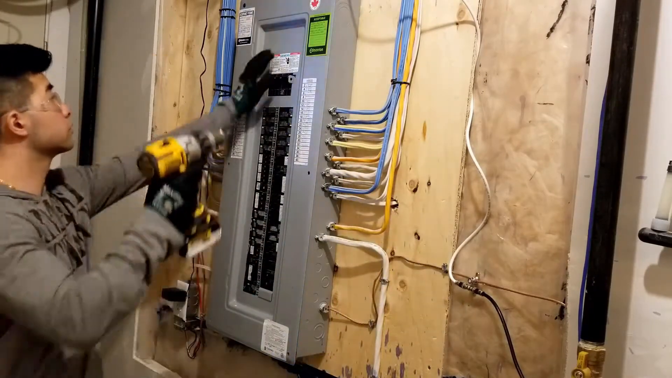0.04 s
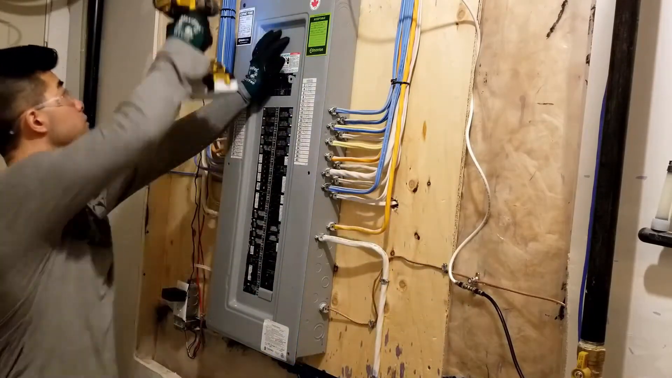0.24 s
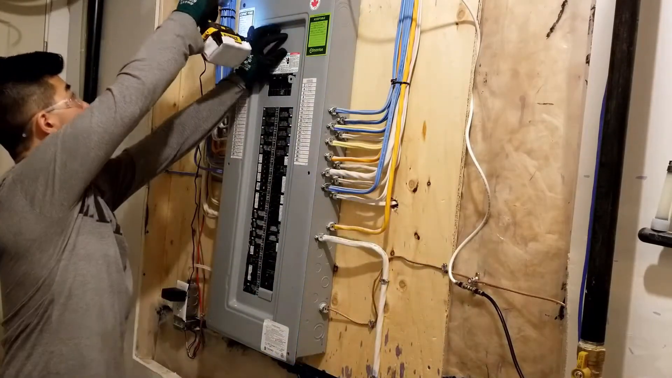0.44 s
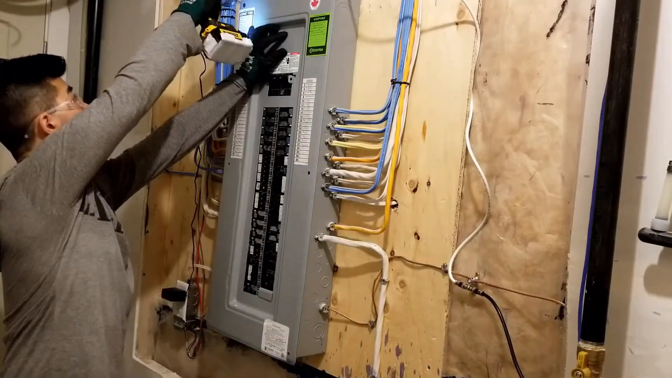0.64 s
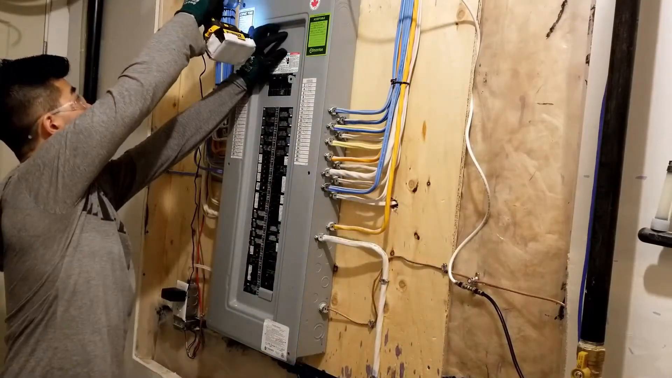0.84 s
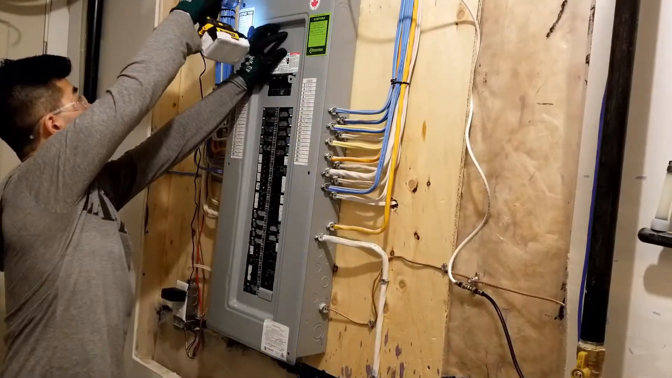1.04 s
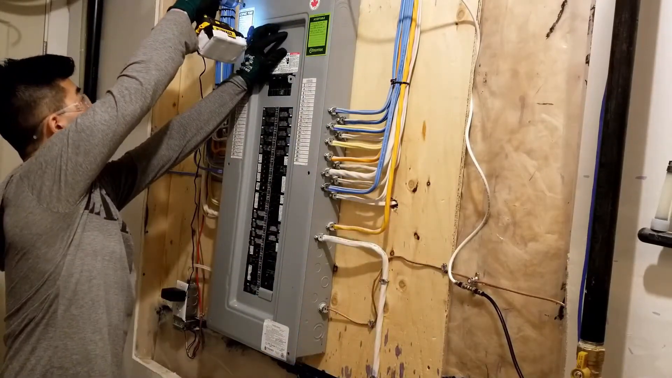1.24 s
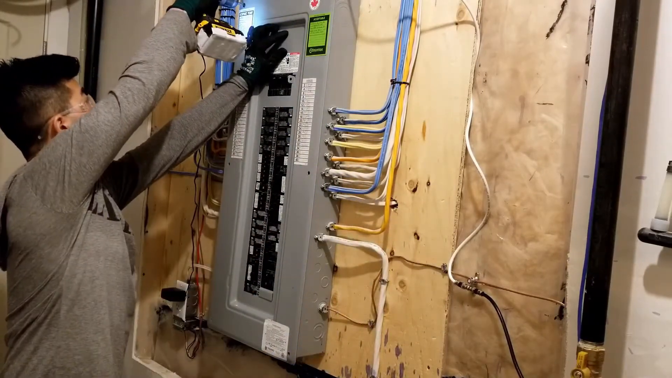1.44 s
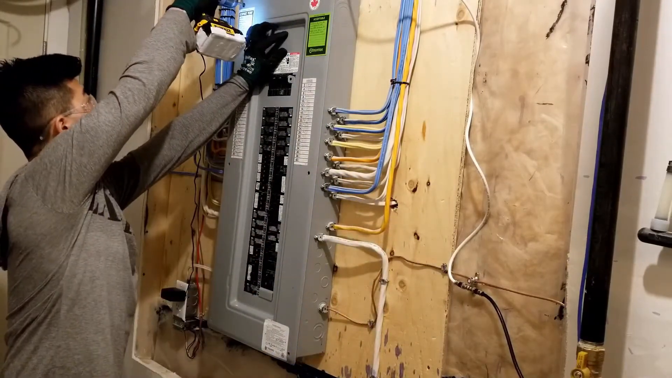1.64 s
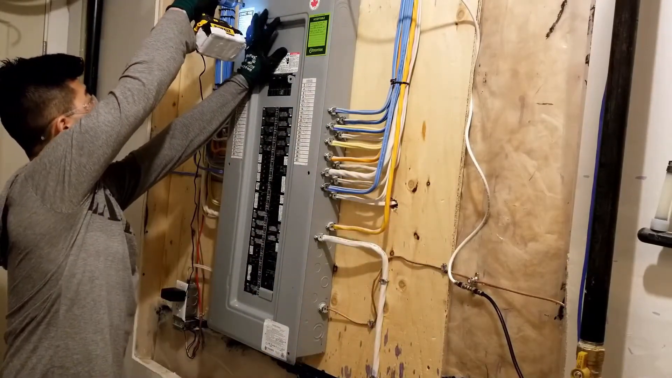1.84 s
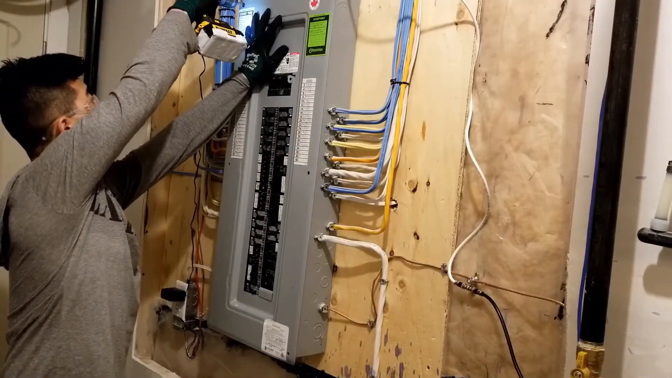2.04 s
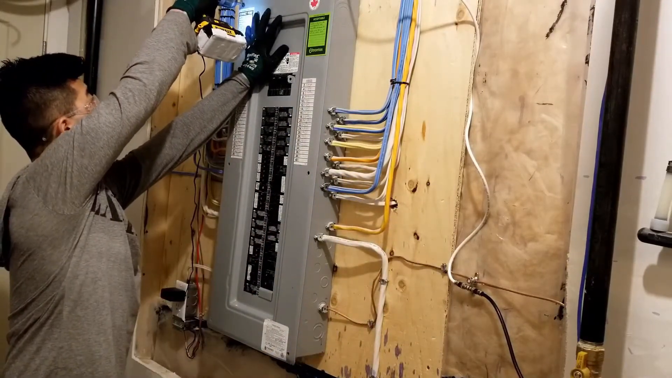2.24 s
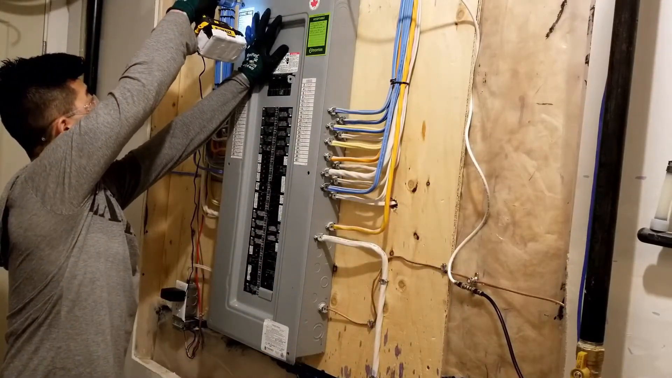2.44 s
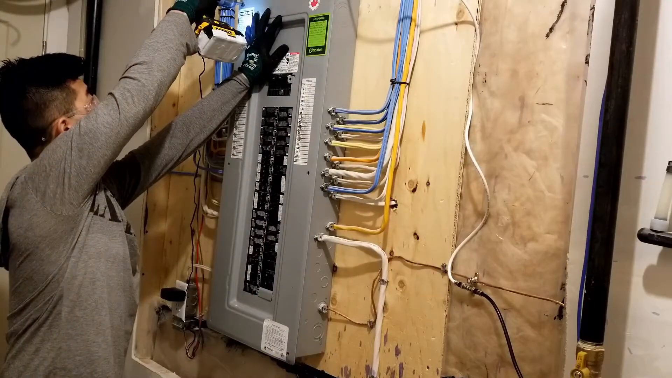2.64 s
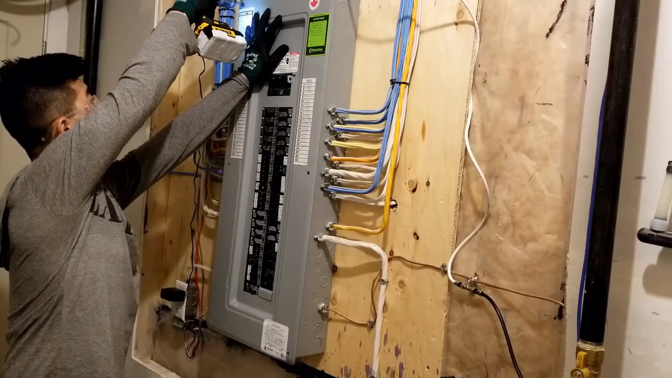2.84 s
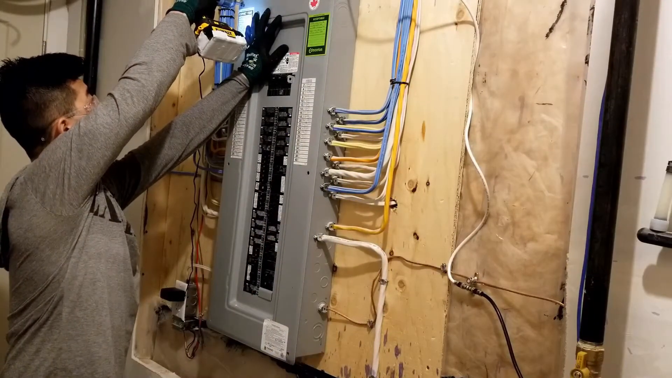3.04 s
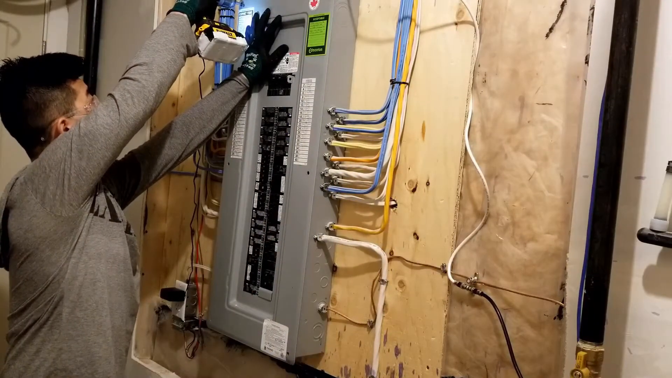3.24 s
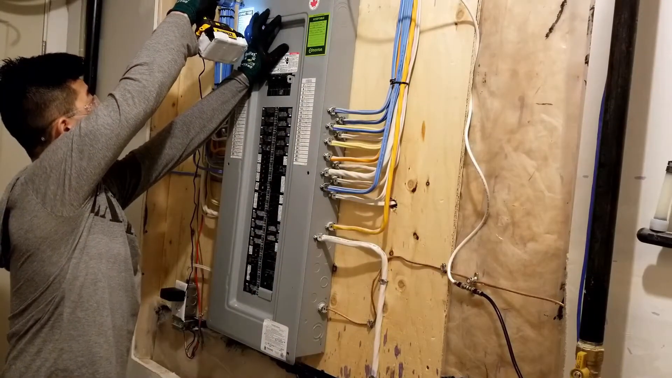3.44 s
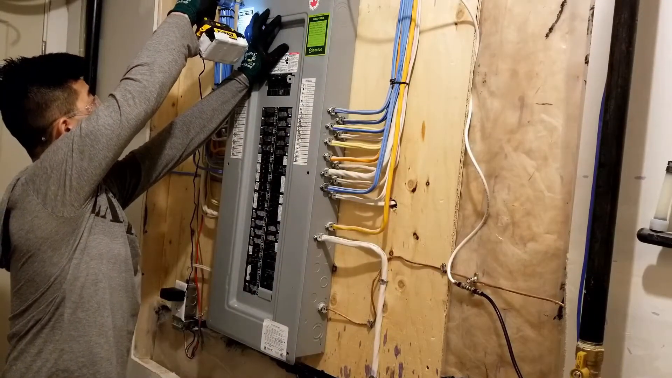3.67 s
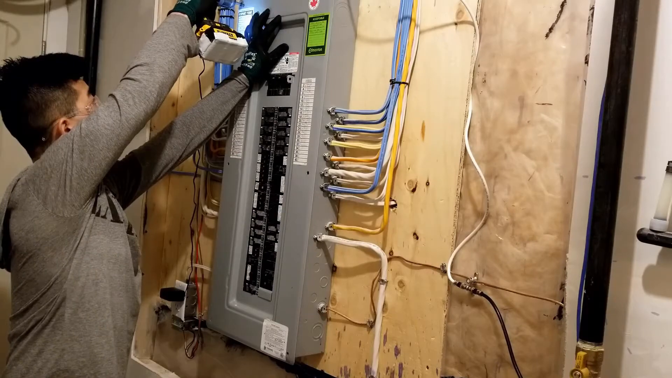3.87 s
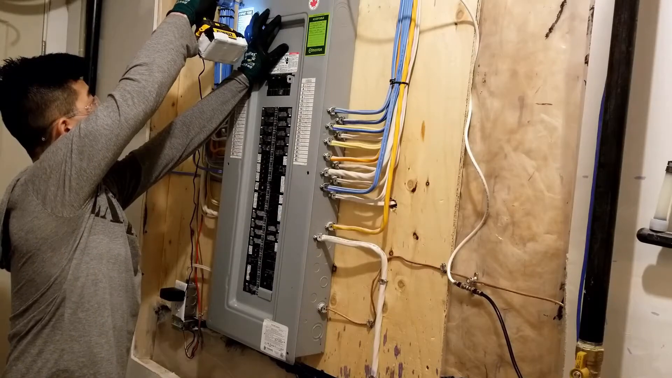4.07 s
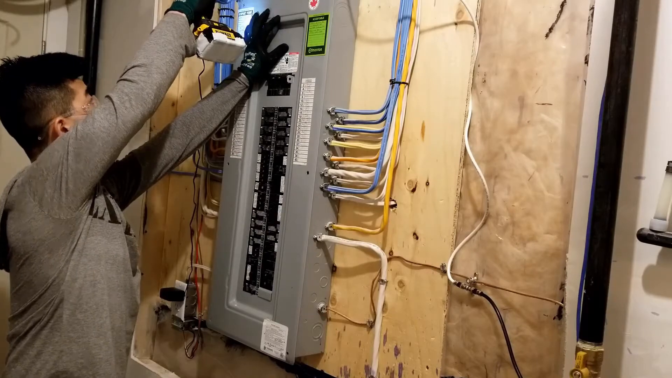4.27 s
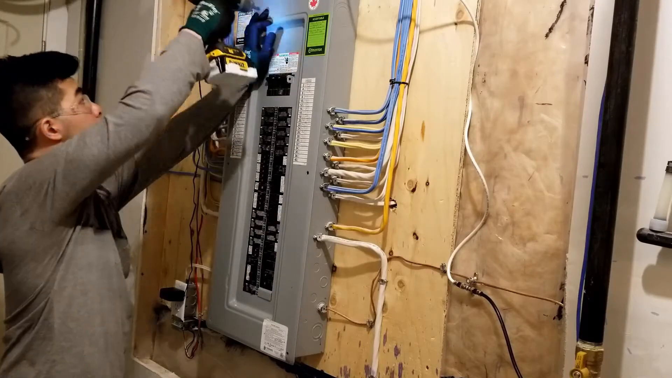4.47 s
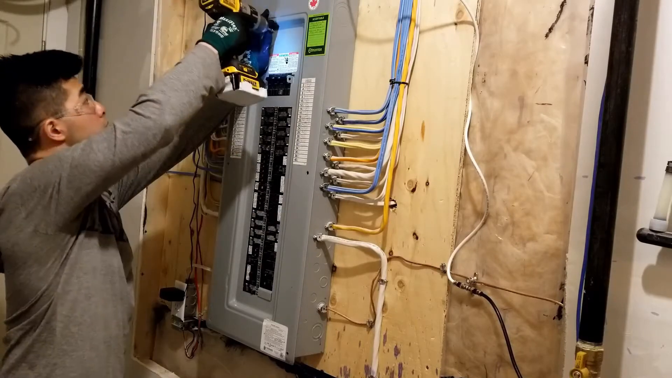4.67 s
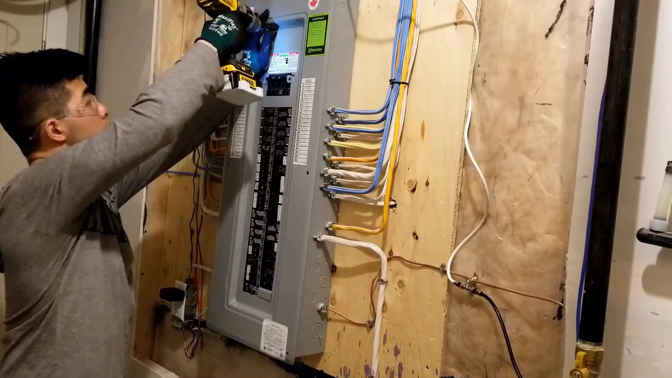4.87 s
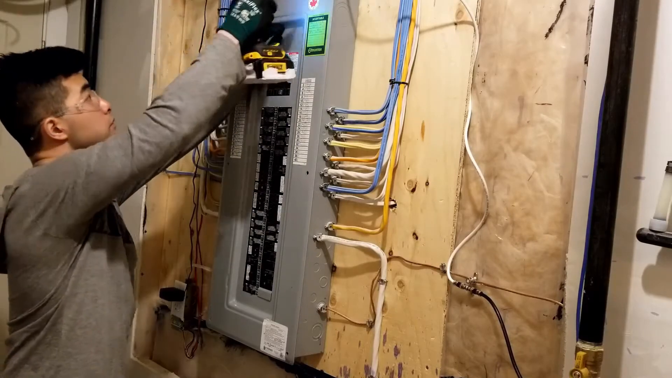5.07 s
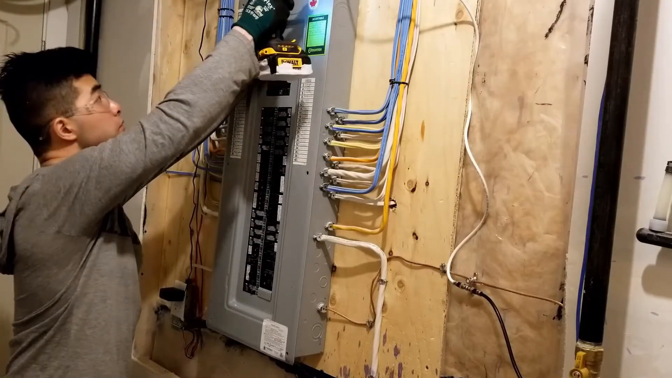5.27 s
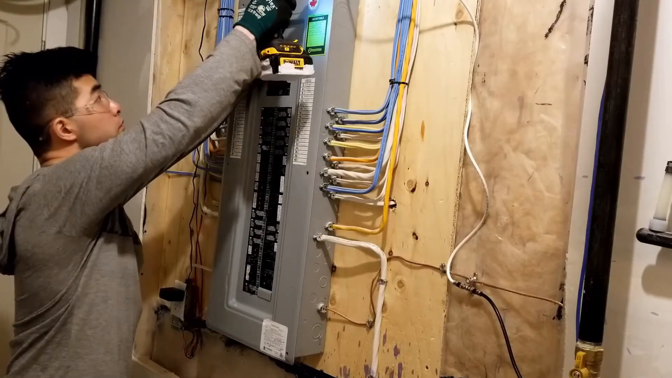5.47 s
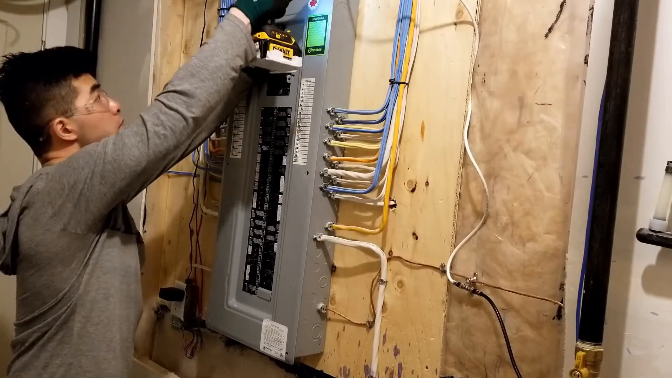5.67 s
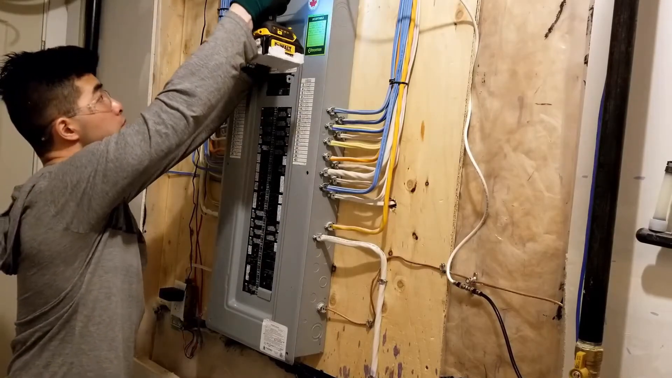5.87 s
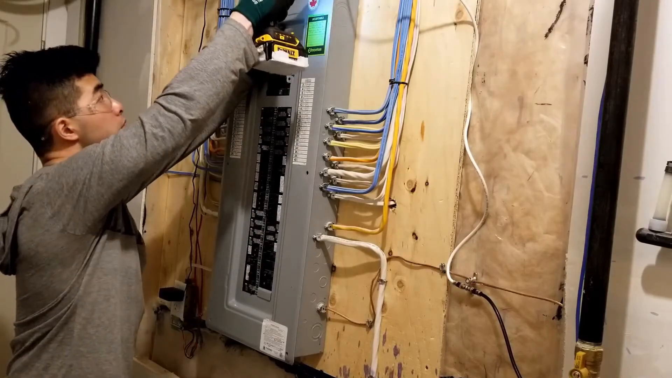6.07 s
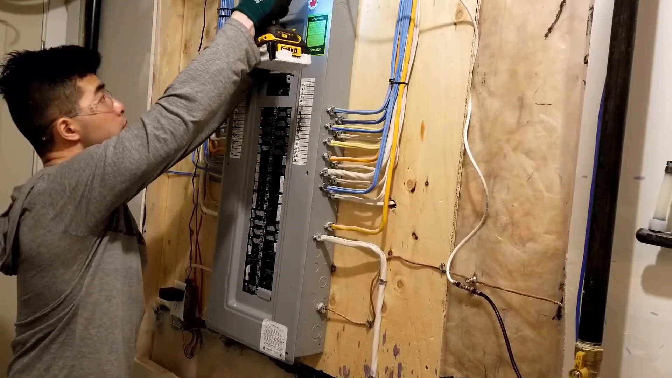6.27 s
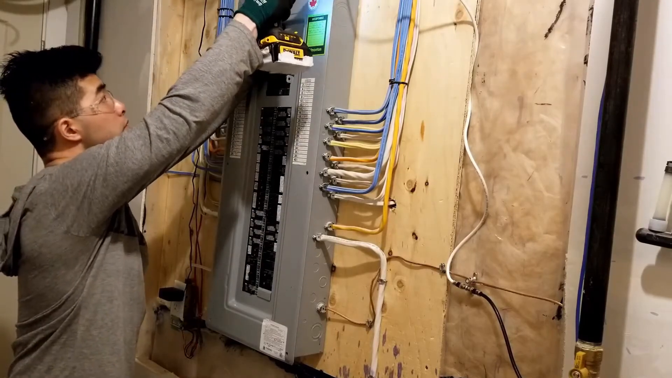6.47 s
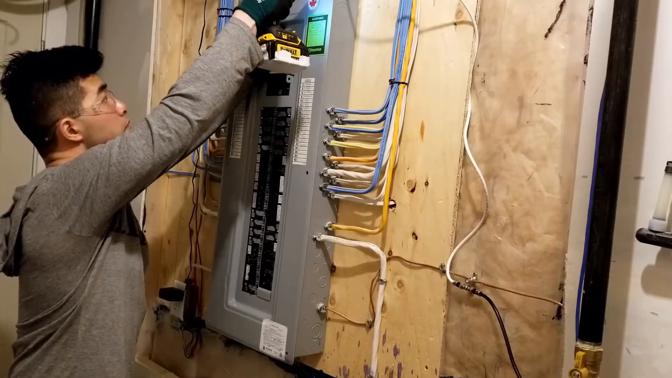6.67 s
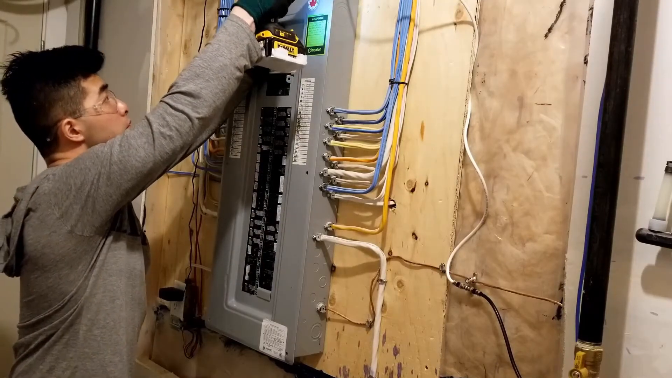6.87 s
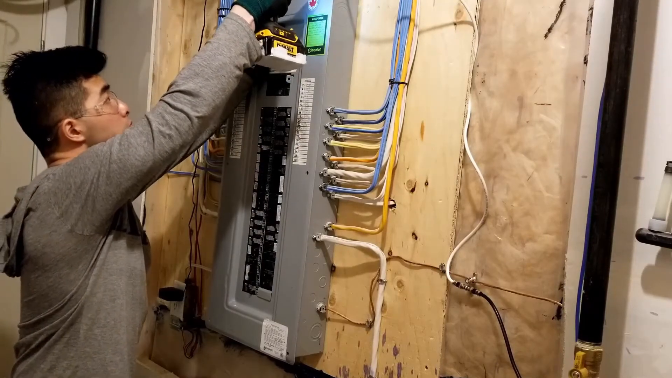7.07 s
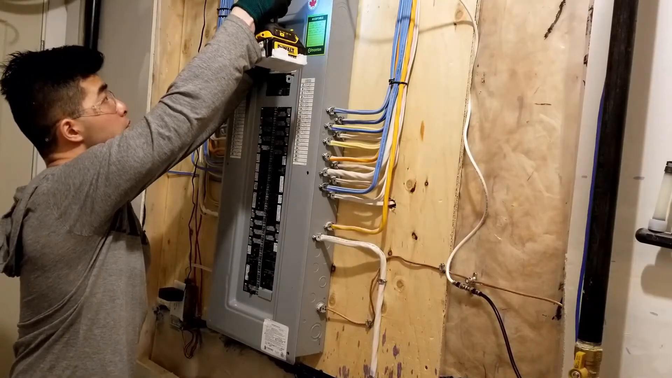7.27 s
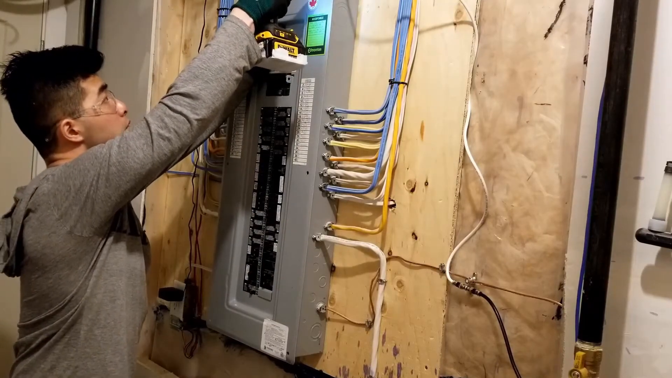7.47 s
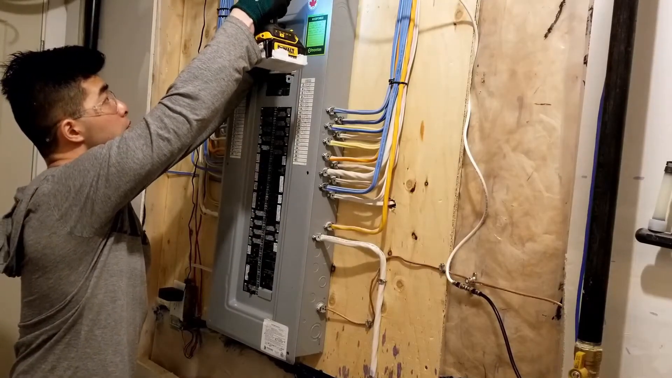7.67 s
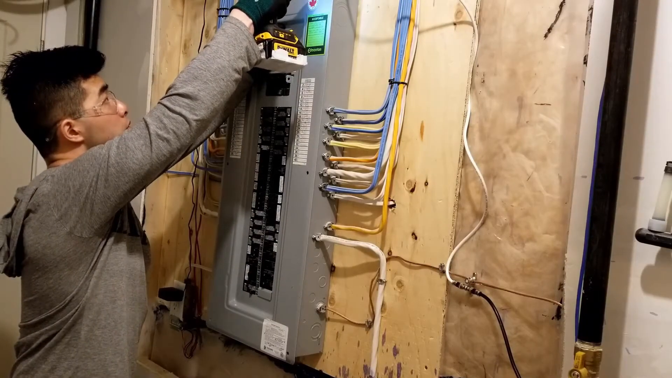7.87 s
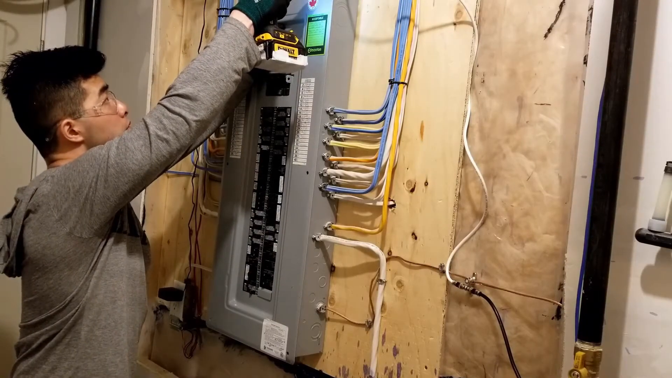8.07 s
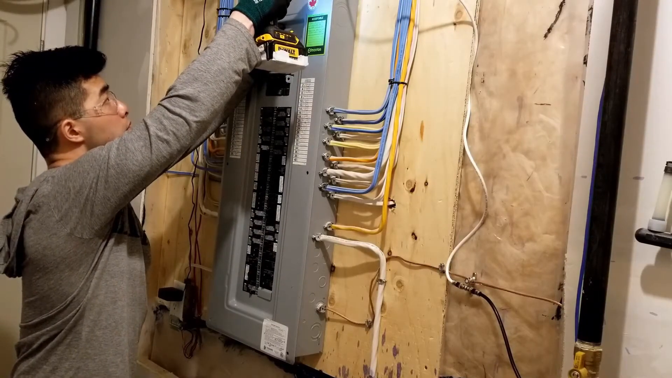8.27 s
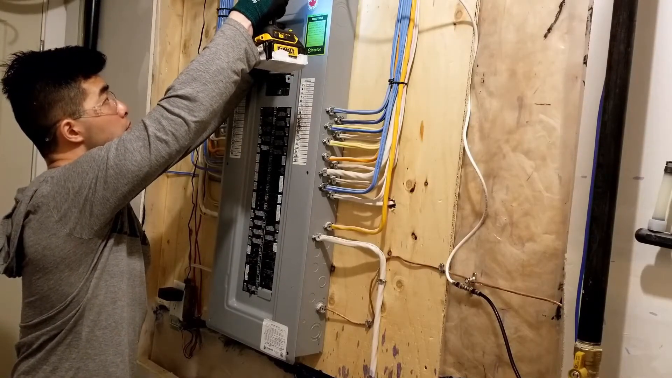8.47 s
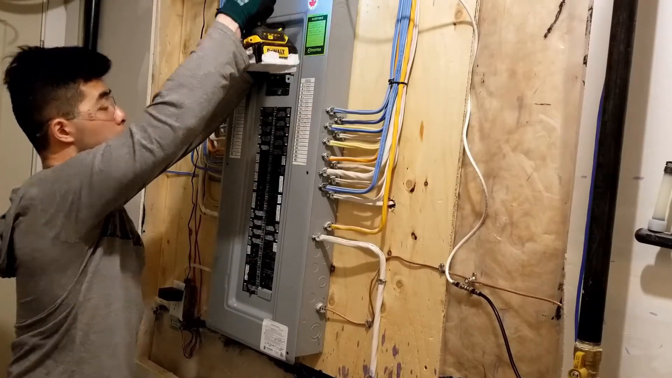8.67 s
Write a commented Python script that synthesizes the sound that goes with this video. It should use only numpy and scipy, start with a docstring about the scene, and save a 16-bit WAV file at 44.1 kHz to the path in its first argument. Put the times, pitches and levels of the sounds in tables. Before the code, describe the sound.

Close by in a small room, a cordless drill removes screws from a metal cover. Faint cloth rustle and taps lead to a brief burst and a long, slow, wavering run with a low groan from the screw. Soft thumps of shifting weight follow, then two short bursts among metallic knocks and chuck clacks. Finally the drill spins up fast and slows to a stop, with gear rattle and a high electric whine throughout each run.

```python
"""Cordless drill removing screws

A drill backs screws out of a steel cover in a small, bare room. Its gears rattle and sing,
its speed control whines near 14 kHz, and the chuck (the clamp that holds the bit) clacks
when the trigger is let go. Between runs the bit knocks on the screw heads and the cover,
and the worker shifts about."""
import sys
import numpy as np
from scipy import signal
from scipy.fft import rfft, irfft
from scipy.io import wavfile
from scipy.ndimage import uniform_filter1d

SR = 44100
rng = np.random.default_rng(int(sys.argv[2]) if len(sys.argv) > 2 else 0)


def generate_wav(sig):
    """Save sig (samples, or channels by samples) to the path in sys.argv[1] as 16-bit PCM at SR."""
    pcm = np.round(np.clip(np.atleast_2d(sig).T, -1, 1) * 32767).astype(np.int16)
    wavfile.write(sys.argv[1], SR, pcm)


N = 384111
T = np.arange(N) / SR


def amp(db):
    """Turns decibels into a gain. Table levels are relative: later gains shift them."""
    return 10 ** (np.asarray(db) / 20)


def unit(x):
    """Scales a signal to an average (rms) size of 1."""
    return x / np.sqrt(np.mean(x ** 2) + 1e-20)


def look_up(points, hz):
    """Reads between the rows of a table, along a log-frequency axis."""
    f, value = np.transpose(points)
    return np.interp(np.log(hz + 1), np.log(f + 1), value)


def colour(x, spectrum, peaks=()):
    """Gives a sound its tone colour: a broad shape with ringing peaks on top."""
    hz = np.fft.rfftfreq(x.shape[-1], 1 / SR)
    peak_db = sum(db / (1 + (2 * (hz - f) / width) ** 2) for f, width, db in peaks)
    return irfft(rfft(x) * amp(look_up(spectrum, hz) + peak_db), x.shape[-1])


def wander(hz):
    """A random drift that heads for a new value hz times a second."""
    knots = rng.standard_normal(N // 16)
    return unit(np.interp(T * hz, np.arange(len(knots)), knots))


def add(mix, s, sound):
    """Mixes a sound in at s seconds."""
    part = mix[max(round(s * SR), 0):][:len(sound)]
    part += sound[:len(part)]


def stroke(start, length, attack_s, release_s):
    """A loudness curve that rises, holds and dies away."""
    return np.clip((T - start) / attack_s, 0, 1) * np.exp(-np.maximum(T - start - length, 0) / release_s)


def blow(spectrum, chatter_s, size=8192):
    """One hit: two things chatter together briefly and the struck body colours the sound."""
    t, hz = np.arange(size) / SR, np.fft.rfftfreq(size, 1 / SR)
    log_gain = np.log(amp(look_up(spectrum, abs(np.fft.fftfreq(size, 1 / SR)))))
    body = np.exp(np.conj(signal.hilbert(log_gain)))[:len(hz)]  # rings only after the hit
    contact = rfft(rng.standard_normal(size) * np.sqrt(t) * np.exp(-t / chatter_s))
    contact /= np.sqrt(uniform_filter1d(abs(contact) ** 2, size=41))  # even out its spectrum
    fade = np.clip((t[-1] * .7 - t) * 20, 0, 1)
    hit = irfft(contact * body) * fade
    return hit * np.sqrt(.025 * SR / np.sum(hit ** 2))  # as much energy as 25 ms at rms 1


def strikes(rows, spectrum, chatter_s, level_db, dull_db=0, firm_db=-45, soft_db=-62):
    """A series of hits on one body; soft ones chatter longer and can be made duller."""
    out = np.zeros(N)
    hz, shape = np.transpose(spectrum)
    for s, db in rows:
        softness = np.interp(db, [soft_db, firm_db], [1, 0])
        body = np.c_[hz, shape + softness * dull_db * (hz > 2000)]
        add(out, s, amp(db + level_db) * blow(body, chatter_s * (1 + 2.1 * softness)))
    return out


# Tone colour of the background (frequency [Hz], level [dB])
HISS_COLOUR = [(15, -36), (25, 3), (119, 2), (380, -7), (688, -10), (1000, -13), (1430, -13.5),
               (2580, -14.5), (2870, -14), (3470, -14.5), (4300, -17.5), (9160, -22.5), (12000, -10),
               (15700, -11.5)]


def hiss(level_db=-70):
    """A faint, steady hiss, different in each ear."""
    return amp(level_db) * unit(colour(rng.standard_normal((2, N)), HISS_COLOUR))


# How long the room echoes (frequency [Hz], time to fade by 60 dB [s])
ECHO_TIMES = [(60, 0.27), (250, 0.28), (550, 0.11), (2000, 0.16), (6000, 0.13), (14000, 0.093)]


def walls(direct_db, size=12288):
    """The room's answer to a click: the direct sound, then dense echoes from close walls."""
    echoes = rng.choice([-1., 1.], (2, size)) * (rng.random((2, size)) < .15)
    hz, t, bands = signal.stft(echoes, SR, nperseg=128)
    fade = amp(-60 * t / look_up(ECHO_TIMES, hz)[:, None])
    tail = signal.istft(bands * fade, SR, nperseg=128)[1][:, :size]
    tail /= np.linalg.norm(tail, axis=1, keepdims=True)
    tail[[0, 1], [0, 20]] += amp(direct_db)  # reaches the left ear 20 samples sooner
    response = rfft(tail, 2 * size)
    response /= np.sqrt(uniform_filter1d(abs(response) ** 2, size=81))  # same energy in every band
    return irfft(response)[:, :size]


def room(x, balance, direct_db, shifts_per_s, paths):
    """The worker's moving arm and body keep changing the paths that the echoes take."""
    heard = np.zeros((2, N))
    for k in range(paths):
        away = abs((T * shifts_per_s - k + paths / 2) % paths - paths / 2)
        share = np.cos(np.pi / 2 * np.minimum(away, 1))  # each path fades in and out in turn
        heard += signal.oaconvolve((x * share)[None], walls(direct_db), axes=1)[:, :N]
    tilt = np.array(balance)
    return np.array([colour(heard[0], tilt * [1, .5]), colour(heard[1], tilt * [1, -.5])])


# The sleeve slides as the arm rises (time [s], length [s], level [dB])
SWISHES = [(0.0, 0.024, -62), (0.244, 0.13, -57)]
# Tone colour of cloth (frequency [Hz], level [dB])
CLOTH_COLOUR = [(200, 7.5), (450, 2.5), (900, -6.5), (3000, -11.5), (7000, -2), (9000, -9.5), (14000, -1)]


def sleeve(level_db=-1, grain_db=3, attack_s=0.031, release_s=0.13):
    """Cloth rubs on cloth with a grainy swish."""
    rub = unit(colour(rng.standard_normal(N) * amp(grain_db * wander(140)), CLOTH_COLOUR))
    return rub * sum(amp(level_db + db) * stroke(s, length, attack_s, release_s)
                     for s, length, db in SWISHES)


# The worker's weight shifts (time [s], level [dB], pitch [Hz])
WEIGHT_SHIFTS = [(0.08, -59.5, 114), (0.32, -57, 99), (0.629, -64, 110), (3.922, -44.5, 147),
                 (4.198, -45, 121.1), (4.485, -53.5, 128), (4.803, -49.5, 124), (5.057, -56.5, 132),
                 (5.359, -54, 122), (5.679, -52, 123.7), (8.472, -46, 178), (8.541, -43, 180)]
# Tone colour of a bump (frequency [times the pitch], level [dB])
BUMP_COLOUR = [(.15, -12.5), (.4, -3.5), (1, 3.5), (1.4, -4.5), (2.1, -21.5), (4.5, -32), (12, -46.5),
               (40, -76)]


def bumps(gap_s=0.038, step_db=-7, chatter_s=0.0075):
    """Each shift makes three dull bumps on floor and wall, each softer than the last."""
    out = np.zeros(N)
    for s, db, hz in WEIGHT_SHIFTS:
        body = np.array(BUMP_COLOUR) * [hz, 1]
        for k in range(3):
            add(out, s + k * gap_s, amp(db + k * step_db) * blow(body, chatter_s))
    return out


# Light touches of metal (time [s], level [dB])
TICKS = [(0.322, -49), (0.342, -58), (4.938, -73)]
# Tone colour of a tick (frequency [Hz], level [dB])
TICK_COLOUR = [(700, -49), (1200, 2.5), (2500, -1), (4000, 1.5), (7500, 4), (9500, -5), (14000, 8.5),
               (16000, -20.5)]


def metal_ticks():
    """Metal touches metal with a short, bright tick."""
    return strikes(TICKS, TICK_COLOUR, chatter_s=0.001, level_db=3.5)


# Spells of low rumble (time [s], length [s], level [dB], grit against rumble [dB])
RUMBLES = [(1.541, 0.36, -49, -30), (1.885, 0.015, -38, -30), (1.944, 0.063, -34.5, -25),
           (2.016, 0.057, -42.5, -28), (2.073, 0.936, -50.5, -7), (3.412, 0.073, -42, -32),
           (5.544, 0.03, -48, -14.5), (6.035, .04, -35, -11.5), (6.082, .028, -38, -2),
           (6.595, .04, -42, -20), (7.105, 0.23, -38.5, -30), (7.331, 0.287, -47, -28)]
# Tone colour of the rumble (frequency [Hz], level [dB])
RUMBLE_COLOUR = [(60, -20.5), (170, -4.5), (290, -3), (450, -6), (600, -9), (850, -10), (1200, -21.5),
                 (4000, -46.5)]
# Tone colour of the bit skating on the screw head (frequency [Hz], level [dB])
GRIT_COLOUR = [(300, -25), (600, 11), (1600, 4.5), (2800, -10), (4000, -9), (7500, -10), (9500, -19),
               (15000, -15)]


def low_rumble(level_db=-2, grit_db=2, jolts_per_s=600, attack_s=0.0087, release_s=0.015):
    """The screw groans as it turns, and the fast motor shakes the drill; a skating bit adds grit."""
    jolts = (rng.random(N) < jolts_per_s / SR) * (1 + 0.65 * rng.standard_normal(N))
    rumble = unit(colour(jolts, RUMBLE_COLOUR))
    scratch = unit(colour(rng.standard_normal(N) * amp(5.4 * wander(530)), GRIT_COLOUR))
    out = np.zeros(N)
    for s, length, db, grit in RUMBLES:
        loudness = amp(level_db + db) * stroke(s, length, attack_s, release_s)
        out += loudness * (rumble + amp(grit_db + grit) * scratch)
    return out


# The bit hits screw and cover (time [s], thud [dB], clank [dB], click [dB])
KNOCKS = [(0.385, -59, -65, -85), (0.638, -55, -65, -73), (0.97, -39, -44, -54.5), (1.315, -32, -37, -37.5),
          (1.368, -44.5, -63, -76), (5.506, -45.5, -45, -66), (5.597, -42, -43, -59),
          (6.113, -34, -23, -30.5), (6.541, -45.5, -39, -62), (6.623, -49, -41, -63),
          (6.86, -38, -30.5, -31.5)]
# Tone colour of the struck cover (frequency [Hz], level [dB])
COVER_COLOUR = [(24, -42), (40, -6.5), (301, -10.5), (461, 0.5), (859, -7.5), (926, -7.5), (1080, -10.5),
                (1770, -16.5), (1910, -27.5), (2770, -23), (3220, -33), (6810, -29), (8310, -41),
                (15500, -40)]
# Notes the cover rings on with (frequency [Hz], level [dB], time to fade by 60 dB [s])
COVER_NOTES = [(386.4, 4, 0.42), (500, -6, 0.28), (554, -21, .27), (915, -19.5, .19), (1443, -13, .14),
               (1763, -1, 0.22), (2676, -14, .14)]


def bit_knocks(ring_db=-19, low_hz=240, high_hz=2600, clank_lag_s=0.00098, thud_lag_s=0.00293):
    """Each knock clicks at the screw head, then clanks in the cover and thuds into the wall."""
    out, t = np.zeros(N), np.arange(SR // 2) / SR
    hz = np.geomspace(20, 20000, 60)
    shape = look_up(COVER_COLOUR, hz)
    past_low, past_high = (hz / low_hz) ** 6, (hz / high_hz) ** 6
    bass = 1 / (1 + past_low) / (1 + (70 / hz) ** 2)
    middle = past_low / (1 + past_low) / (1 + past_high)
    treble = past_high / (1 + past_high)
    wall, cover, head = (np.c_[hz, shape + 10 * np.log10(band + 1e-8)] for band in (bass, middle, treble))
    for s, thud, clank, click in KNOCKS:
        add(out, s + thud_lag_s, amp(thud) * blow(wall, chatter_s=0.0042))
        add(out, s + clank_lag_s, amp(clank) * blow(cover, chatter_s=0.0039))
        add(out, s, amp(click) * blow(head, chatter_s=0.0082))
        ring = sum(amp(db - 60 * t / fade_s) * np.sin(2 * np.pi * (f * t + rng.random()))
                   for f, db, fade_s in COVER_NOTES)
        muffle_db = .5 * min(clank + 26, 0)  # the bit muffles the ring of light knocks
        add(out, s + clank_lag_s, amp(clank + ring_db + muffle_db) * ring)
    return out


# Clacks of the chuck (time [s], level [dB])
CLACKS = [(0.167, -65.5), (1.354, -43), (1.487, -69.5), (4.36, -58.5), (4.58, -76), (5.092, -76.5),
          (5.937, -33), (6.924, -31.5), (8.642, -42)]
# Tone colour of the chuck (frequency [Hz], level [dB])
CHUCK_COLOUR = [(100, -16), (350, -11.5), (550, -6.5), (800, -1.5), (1100, -3), (1350, 5.5), (1750, -12.5),
                (2800, -9.5), (4000, -18), (7500, -16), (10000, -22), (16000, -12)]


def chuck_clacks():
    """The chuck locks as the motor stops, or shifts because it sits a little loose."""
    return strikes(CLACKS, CHUCK_COLOUR, chatter_s=0.00096, level_db=4.5, dull_db=-3)


# Motor speed is counted in coil switches a second; three switches make one motor turn.
CREEP_HZ = 140
# Short jabs at the trigger (start [s], end [s], top speed [Hz], gear load [dB], motor load [dB])
JABS = [(1.215, 1.376, 199.7, 9, 2), (5.763, 5.944, 410.4, 6.5, 6.5), (6.772, 6.933, 555, 6.5, 5)]
# A tight screw is eased out (time [s], speed [Hz])
EASING = [(1.519, 208.5), (1.62, 321.6), (1.8, 307), (2.02, 455), (2.8, 445.2), (3.1, 469.6), (3.27, 435),
          (3.38, 280.6), (3.55, 386), (3.7, 244.5), (3.92, 235.8), (4.06, 442), (4.15, 369), (4.23, 196.4),
          (4.375, 158.6)]
# A loose screw is spun out and the trigger is relaxed (time [s], speed [Hz])
SPINNING = [(7.042, 199.1), (7.1, 959.3), (7.17, 1887), (7.27, 1909), (7.39, 1487), (7.7, 659.2),
            (7.84, 239), (8.05, 291.5), (8.645, 142.2)]
# Long pulls of the trigger (speed table, gear load [dB], motor load [dB])
LONG_PULLS = [(EASING, 6.08, 6.3), (SPINNING, 0.41, 0.54)]


def trigger_pulls(let_go_at=.8):
    """Lists each pull as (times, speeds, gear load, motor load); a jab's speed follows an arch."""
    progress = np.linspace(0, 1, 30)
    arch = np.sin(np.pi * let_go_at * progress) ** 1.2
    jabs = [(start + progress * (end - start), CREEP_HZ + (top_hz - CREEP_HZ) * arch, *loads)
            for start, end, top_hz, *loads in JABS]
    return jabs + [(*np.transpose(curve), *loads) for curve, *loads in LONG_PULLS]


def drive(start_s=0.027, swell_s=0.057, brake_s=.01, loosen_db_per_s=-1, surge_db=4):
    """Gear loudness, whine loudness and motor speed; both get louder with speed and load."""
    turning, current, gear_db, motor_db = np.zeros((4, N))
    hz = np.full(N, float(CREEP_HZ))
    for times, speeds, gear_load_db, motor_load_db in trigger_pulls():
        on = (T >= times[0]) & (T < times[-1])
        t = T[on] - times[0]
        hz[on] = np.interp(T[on], times, speeds)
        surge = np.clip(np.gradient(hz[on]) * SR / 12000, 0, 1)  # speeding up draws more current
        motor_db[on] = motor_load_db + surge_db * surge
        gear_db[on] = gear_load_db + loosen_db_per_s * t  # the load eases as the screw comes out
        brake = np.minimum((times[-1] - T[on]) / brake_s, 1)
        turning[on] = np.minimum(t / start_s, brake) ** 2  # soft start, quick brake
        current[on] = np.minimum(t / swell_s, brake) ** 2
    bite = np.interp(hz, [107, 415.4], [0, 1])  # the load builds between these speeds
    shake_db = 5.5 / (1 + (2 * (hz - 1780) / 255) ** 2)  # the gears shake hardest near one speed
    gear_gain = amp(-46 + 6 * np.log2(hz / 456.4) + shake_db + bite * gear_db)
    whine_gain = amp(-24 + bite * motor_db) / (1 + (927 / hz) ** 1.69)  # levels off at high speed
    return turning * gear_gain, current * whine_gain, hz


def motor_whine(switches, chop_hz=14130, spread_hz=210, fizz_db=-7, grain_db=2.5):
    """Chopped current sings in the coils; coil switching splits the note in pairs that part with speed."""
    whine = np.zeros(N)
    for multiple, db in [(.96, 1), (0.8, -11), (0.5, -13)]:
        chop = 2 * np.pi * np.cumsum(chop_hz + spread_hz * wander(900)) / SR
        whine += amp(db) * np.cos(chop) * np.cos(2 * np.pi * multiple * switches)
    fizz_colour = [(10500, -46), (12400, -6.0), (13600, -3), (14900, 0), (15800, -5.5)]
    fizz = colour(rng.standard_normal(N), fizz_colour)  # from uneven switching
    return unit((unit(whine) + amp(fizz_db) * unit(fizz)) * amp(grain_db * wander(300)))


# Notes of the gear teeth (frequency [times the motor speed], level [dB])
GEAR_NOTES = [(1.21, -16), (1.33, -9), (1.483, -6), (1.67, -4.5), (2.13, -4), (2.78, 0.5), (2.97, 1),
              (7.4, -1), (12.4, -16)]
# Broad tone colour of those notes (frequency [Hz], level [dB])
NOTE_COLOUR = [(200, 1), (500, -10), (3400, -1), (4200, -9.5), (6000, -7), (12000, -16), (16000, -40)]
# Where the case boosts them (frequency [Hz], width [Hz], boost [dB])
NOTE_PEAKS = [(476, 160, 15), (975, 260, 13.5), (1365, 233, 10.5), (2234, 518, 12.5), (2773, 360, 11.5),
              (3260, 320, 9), (5600, 300, 0.5)]
# How clearly the teeth sing at each speed (speed [Hz], level [dB])
SINGING = [(200, 1), (300, -8), (460, 2), (650, -10), (1200, 2.5), (1850, 12.5)]


def gear_tones(switches, hz, level_db=-17, blur=.07, least_blur=0.00806, flutter_db=2.5):
    """Meeting teeth make fluttering notes that sing out where the case likes to ring."""
    tones = np.zeros(N)
    looseness = least_blur + blur * (1 - hz / hz.max()) ** 2  # blurs the notes at low speed
    for multiple, db in GEAR_NOTES:
        slack = np.cumsum(hz * looseness * wander(120)) / SR
        note = np.sin(2 * np.pi * multiple * (switches + slack)) * (multiple * hz < SR / 2)
        tones += amp(db + flutter_db * wander(45)) * note
    return amp(level_db + look_up(SINGING, hz)) * colour(tones, NOTE_COLOUR, NOTE_PEAKS)


# Tone colour of the drill's shell (frequency [Hz], level [dB])
SHELL_COLOUR = [(25, -17), (59, -11), (110, -4), (383, -13.5), (981, -5), (1130, -7), (1270, -4.5),
                (1830, -8.5), (3400, -2.5), (4410, -9.5), (5610, -7.5), (7130, -5.5), (7880, -6),
                (9250, -12.5), (10600, -6.5), (12000, -11), (15600, -52), (22000, -120)]
# Extra rows for the shell's highest treble (frequency [Hz], level [dB])
SHELL_TREBLE = [(13000, -18), (16000, -23)]
# Where the gear case rings (frequency [Hz], width [Hz], boost [dB])
CASE_PEAKS = [(540, 110, 6), (1356, 88.4, 1), (3470, 390, 4.5), (5700, 350, 5.5), (7910, 306, 9.5),
              (10640, 450, 4.5)]


def gear_rattle(switches, level_db=1.0, grain_db=2.5):
    """Loose teeth chatter in the case, a little harder once every motor turn."""
    pulse = 1 + 0.31 * np.cos(2 * np.pi * switches / 3)
    teeth = pulse * amp(grain_db * wander(500)) * rng.standard_normal(N)
    return amp(level_db) * unit(colour(teeth, SHELL_COLOUR + SHELL_TREBLE, CASE_PEAKS))


def drill(gear_db=3, whine_db=2, switches_per_chuck_turn=40, sag=.06):
    """The running drill. Its load swells once a chuck turn and, at low speed, drags the pitch."""
    gear_gain, whine_gain, hz = drive()
    chuck_turns = np.cumsum(hz) / SR / switches_per_chuck_turn
    wobble = np.sin(2 * np.pi * chuck_turns + 0.681 * wander(8)) + 0.41 * wander(35)
    drag = sag * (1 - hz / hz.max()) * (wander(14) + .5 * wobble)
    switches = np.cumsum(hz * (1 - drag)) / SR  # coil switches so far
    gear_gain *= amp(gear_db - 1.18 * wobble)
    whine_gain *= amp(whine_db - 1.5 * wobble)
    noise = gear_gain * gear_rattle(switches) + whine_gain * motor_whine(switches)
    return noise, gear_gain * gear_tones(switches, hz)


# Stereo balance of the drill (frequency [Hz], left minus right [dB])
DRILL_BALANCE = [(60, -0.5), (150, 5), (380, -2), (950, 2), (2380, 1), (5980, 5), (15000, 5)]
# Stereo balance of the cover (frequency [Hz], left minus right [dB])
COVER_BALANCE = [(100, 6.5), (300, 0), (800, 1), (8000, 8)]


def scene():
    """Drill, cover and worker in the room, over a faint hiss."""
    clacks, ticks, background = chuck_clacks(), metal_ticks(), hiss()
    noise, tones = drill()
    tool = room(noise + ticks + sleeve(), DRILL_BALANCE, direct_db=-12, shifts_per_s=20, paths=4)
    gears = room(tones, DRILL_BALANCE, direct_db=-2, shifts_per_s=3, paths=2)
    hits_and_rumble = bit_knocks() + clacks + low_rumble() + bumps()
    panel = room(hits_and_rumble, COVER_BALANCE, direct_db=-6, shifts_per_s=7, paths=3)
    return background + panel + gears + tool


def record(dry, cutoff_hz=15780):
    """Steeply cuts off the very highest treble."""
    low_pass = signal.firwin(1023, cutoff_hz, window=("kaiser", 8), fs=SR)
    return signal.oaconvolve(dry, low_pass[None], "same")


dry = scene()
out = record(dry)
generate_wav(out)
```